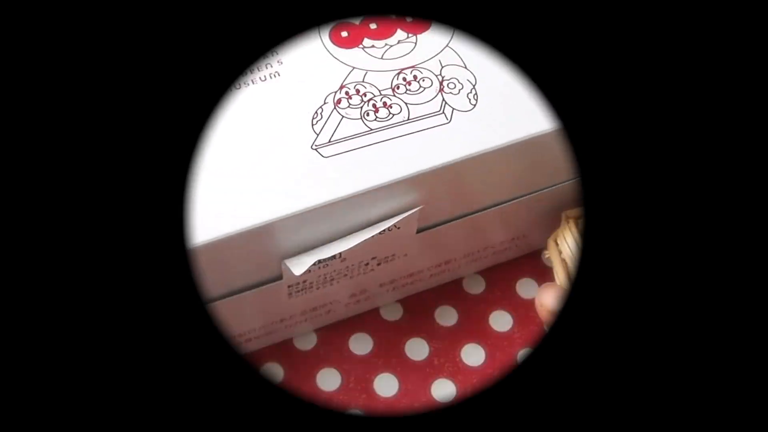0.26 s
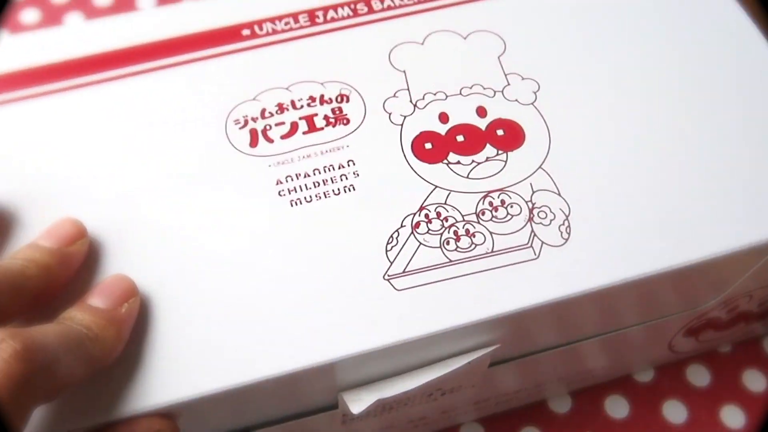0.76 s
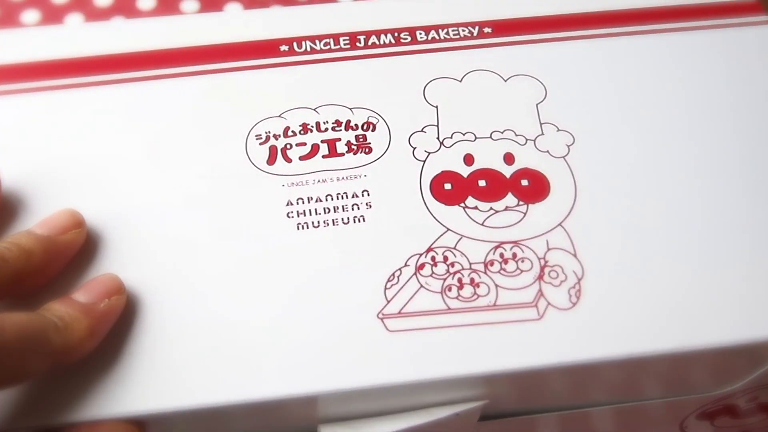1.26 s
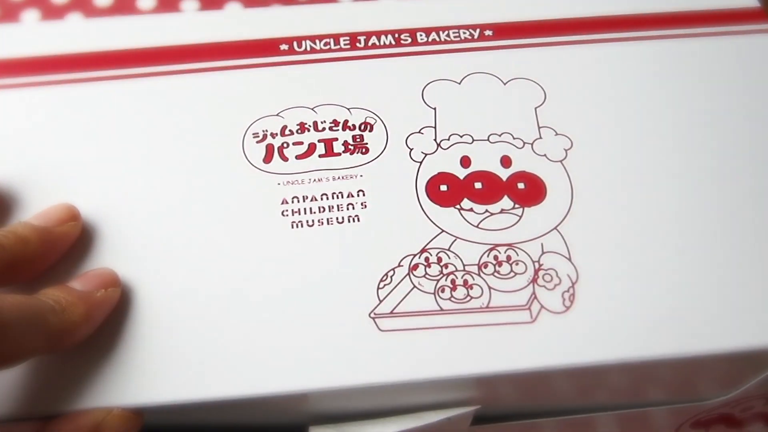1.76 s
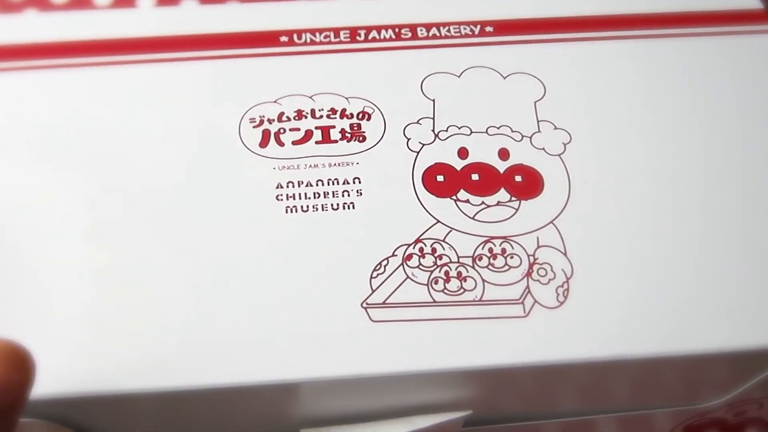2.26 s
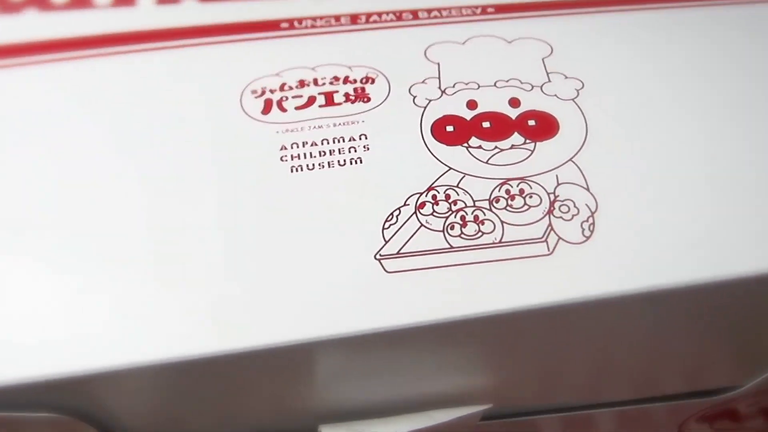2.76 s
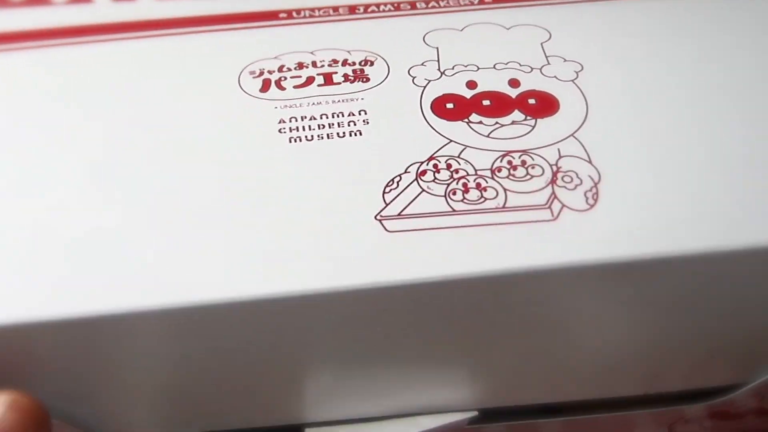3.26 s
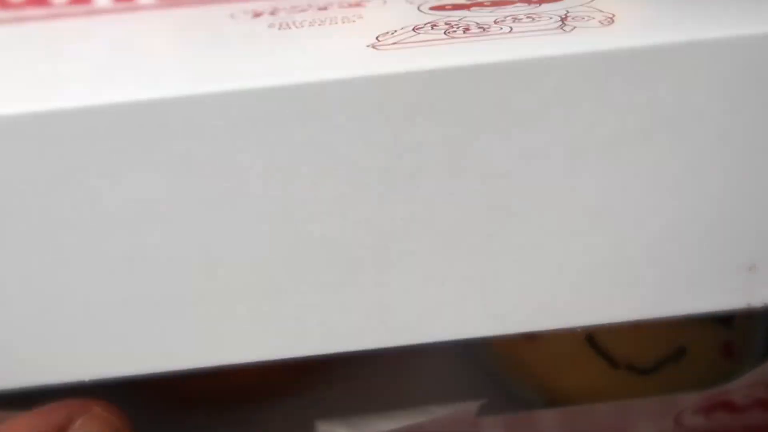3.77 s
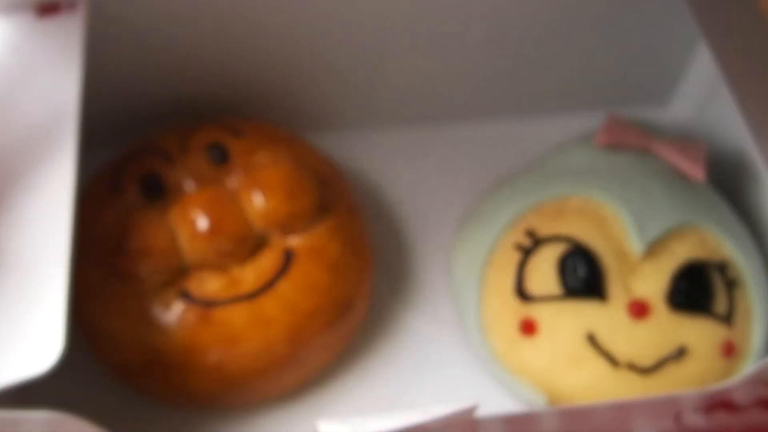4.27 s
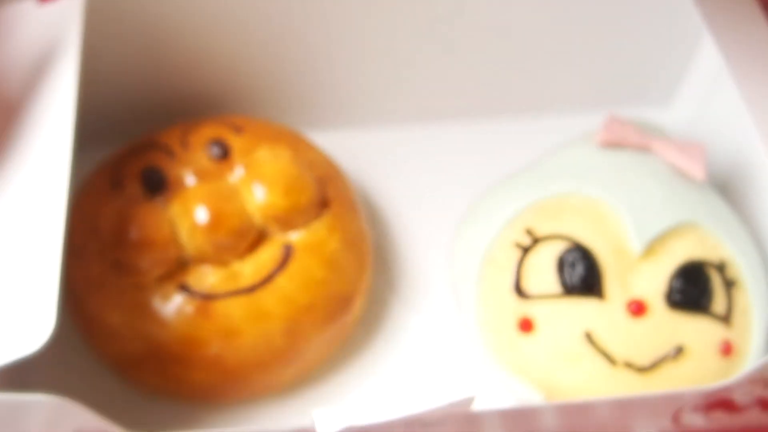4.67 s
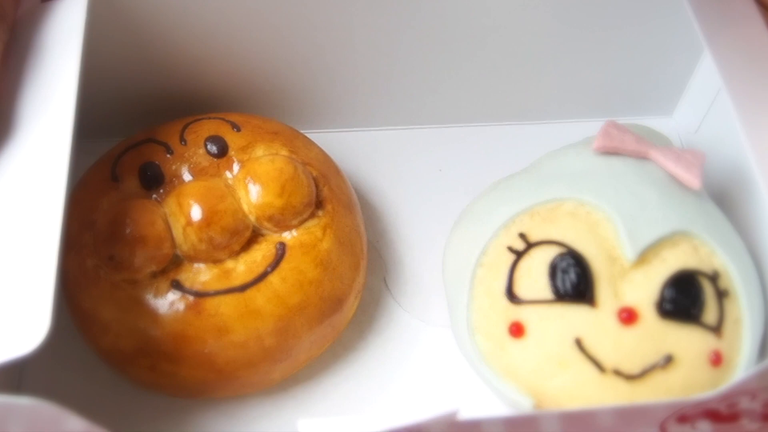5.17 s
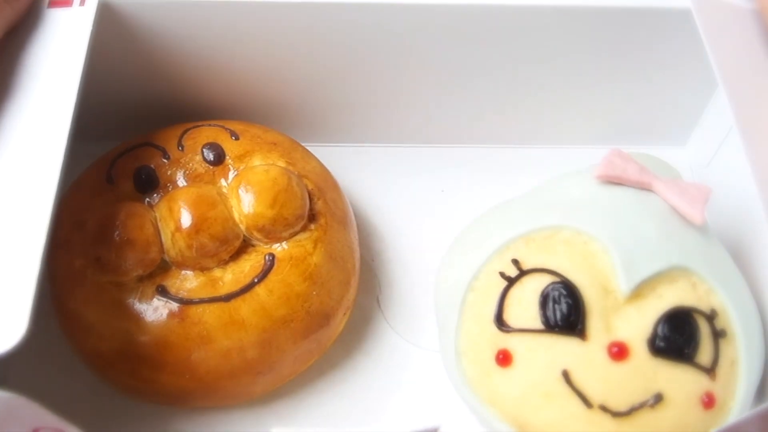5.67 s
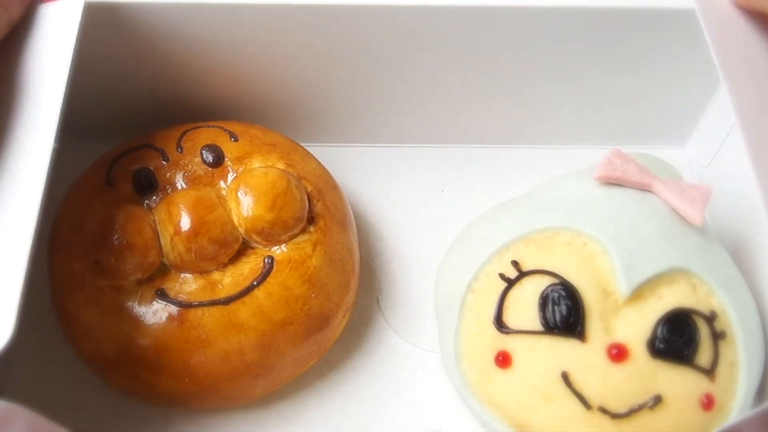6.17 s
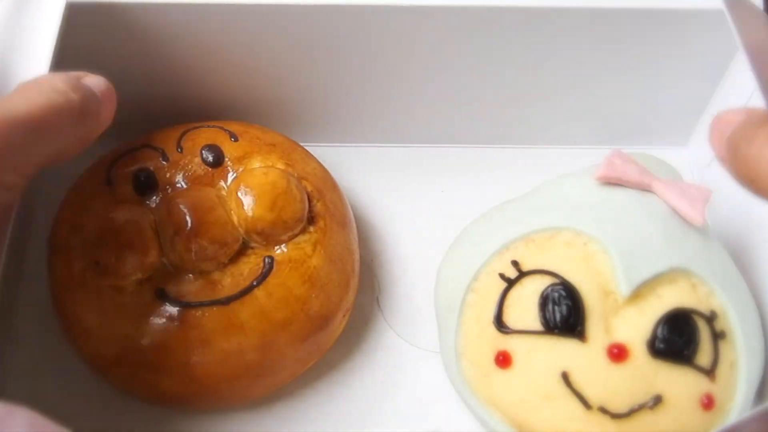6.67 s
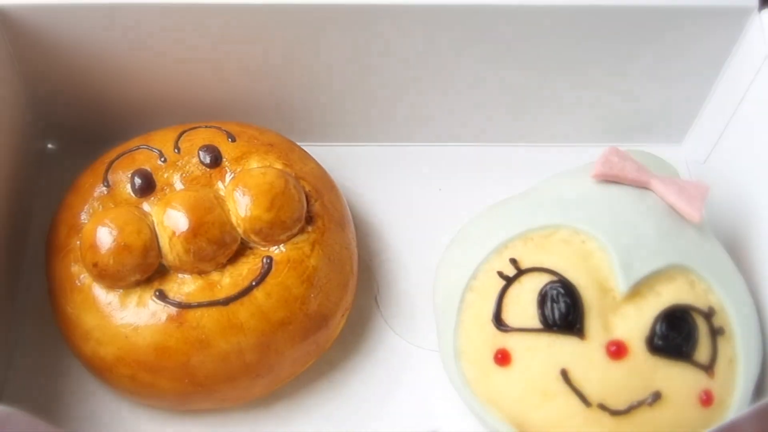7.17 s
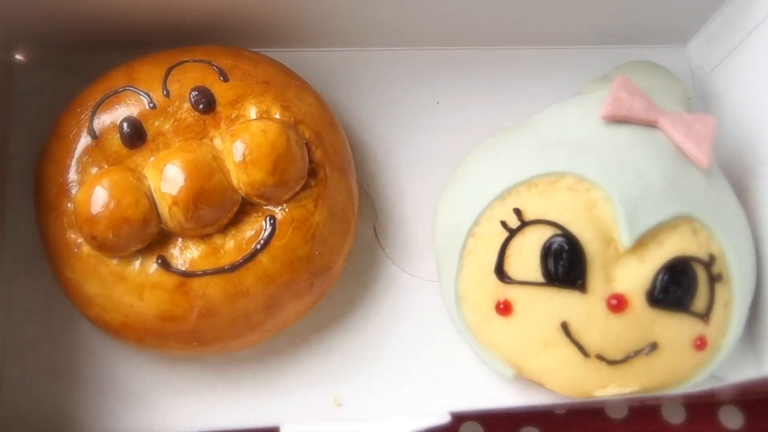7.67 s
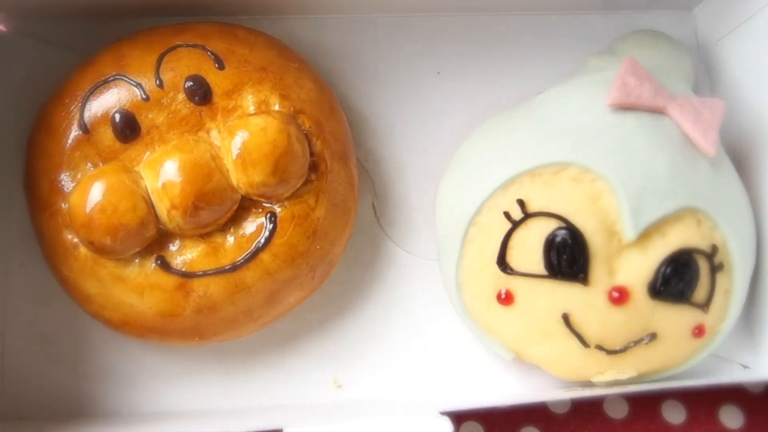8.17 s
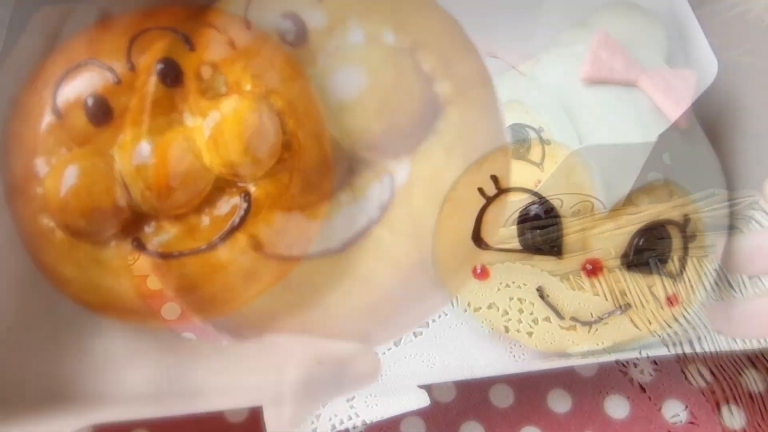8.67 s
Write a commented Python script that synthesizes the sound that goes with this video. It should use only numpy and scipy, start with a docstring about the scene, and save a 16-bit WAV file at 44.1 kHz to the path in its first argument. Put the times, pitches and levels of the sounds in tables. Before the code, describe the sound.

A cardboard box is handled close to the microphone, with light rubbing, clicks and short rasping scrapes as the flap is worked loose. A sharp snap frees the lid, which then bumps down open with hollow knocks and a scrape. Afterwards fingers shift the box gently, making small ticks and a few brief rings of its wall. The small room adds a soft hiss and a faint hum.

```python
"""A hollow paperboard box is opened on a cloth-covered table in a small, quiet room.
Fingers rub the card by stick-slip friction, the tuck flap scrapes and snaps out of its slot, and the
lid swings back and thumps down, exciting the damped modes of the panels and the enclosed air.
Then the box is nudged about, with light ticks and a few brief rings of a single wall.
The room adds a short reverberation, a steady hiss and a faint hum."""
import sys
import numpy as np
from scipy import signal
from scipy.fft import rfft, irfft, next_fast_len
from scipy.io import wavfile
from scipy.ndimage import uniform_filter1d, map_coordinates

SR = 44100
rng = np.random.default_rng(int(sys.argv[2]) if len(sys.argv) > 2 else 0)


def generate_wav(sig):
    """Save sig (samples, or channels by samples) to the path in sys.argv[1] as 16-bit PCM at SR."""
    pcm = np.round(np.clip(np.atleast_2d(sig).T, -1, 1) * 32767).astype(np.int16)
    wavfile.write(sys.argv[1], SR, pcm)


N = 393813
TOP_HZ = 16100  # upper band limit

# Spectra of hissing fibres, a clapping panel and a cracking crease.
# Each row: frequency in Hz, relative spectral density in dB.
HISS_SPECTRUM = [(600, -13), (1400, -7), (2300, -8), (3100, -3.5), (5300, -8.5), (8200, -9.5), (10800, -23),
                 (14000, -19), (16000, -31)]
CLAP_SPECTRUM = [(150, -15), (450, 6.5), (900, 11), (1500, 4), (3000, -0.5), (4500, -18.5), (9000, -26)]
CRACK_SPECTRUM = [(1200, -39), (3000, 11), (4800, 10.5), (8000, 7), (11000, -3.5), (16000, -41)]


def amp(db):
    """Amplitude ratio of a level in decibels."""
    return 10 ** (np.asarray(db) / 20)


def unit(x):
    """Normalisation to rms 1."""
    return x / np.sqrt(np.mean(x ** 2) + 1e-20)


def along(points, hz):
    """Interpolation of (Hz, value) points on a logarithmic frequency axis."""
    knots_hz, values = np.transpose(points)
    return np.interp(np.log(hz + 1), np.log(knots_hz + 1), values)


def wobble(rate):
    """Smooth random modulation: a spline through rate knots a second."""
    knots = rng.standard_normal(int(N * rate / SR) + 4)
    return map_coordinates(knots, [np.arange(N) * rate / SR])


def filtered(x, response):
    """Linear filtering: the spectrum of x times a frequency response."""
    n = x.shape[-1]
    padded = next_fast_len(n + SR // 10)
    return irfft(rfft(x, padded) * response(np.fft.rfftfreq(padded, 1 / SR)), padded)[..., :n]


def stereo(pair, spectrum):
    """Partial coherence: two independent signals become a coloured stereo pair, alike in the bass."""
    # Each row: frequency in Hz, correlation of left and right.
    coherence = [(300, 0.985), (1100, 0.83), (2200, 0.56), (12000, 0.15)]

    def mid_side_gains(hz):
        angle = np.arccos(np.clip(along(coherence, hz), -1, 1)) / 2
        return amp(along(spectrum, hz)) * [np.cos(angle), np.sin(angle)]

    mid, side = filtered(pair, mid_side_gains)
    return unit(np.array([mid + side, mid - side]))


def noise(spectrum, size):
    """Gaussian stereo noise shaped to a spectrum, at rms 1."""
    return stereo(rng.standard_normal((2, size)), spectrum)


def add(track, start_s, sound):
    """Superposition of a sound on a track."""
    part = track[:, max(round(start_s * SR), 0):][:, :sound.shape[-1]]
    part += sound[..., :part.shape[-1]]


def gate(start_s, length_s, attack_s=0.007, release_s=0.016):
    """An envelope that rises, holds and decays exponentially."""
    t = np.maximum(np.arange(N) / SR - start_s, 0)
    return (1 - np.exp(-t / attack_s)) * np.exp(-np.clip((t - length_s) / release_s, 0, 20))


def friction(spectrum, slips_per_s, spread_db, smooth, patchy_db):
    """Stick-slip friction: fibres let go in tiny impulses; resonances shift as the contact travels."""
    slips = (rng.random(N) < slips_per_s / SR) * amp(spread_db * np.minimum(rng.exponential(size=N), 2))
    impulses = unit(slips * np.sign(rng.standard_normal((2, N))))
    rush = impulses + smooth * rng.standard_normal((2, N))
    spectra = signal.stft(rush, nperseg=256)[2]
    patches = uniform_filter1d(rng.standard_normal(spectra.shape[1:]), size=2, axis=0)  # over frequency
    patches = unit(uniform_filter1d(patches, size=24, axis=1))  # over time
    uneven = signal.istft(spectra * amp(patchy_db * patches), nperseg=256)[1][:, :N]
    return stereo(uneven, spectrum)


def rubbing_gains():
    """Incoherent sources add in power: grip and slides set the gains of drumming, rasp and hiss."""
    # The holding hand creeps over the card. Each row: time in seconds, body and treble drive in dB.
    creep = [(0.0, -42.5, -56), (0.15, -52.5, -55), (0.37, -46, -50.5), (0.6, -46.5, -51),
             (1.37, -48.5, -56.5), (1.84, -39.5, -54), (2.29, -50.5, -55.5), (2.51, -43, -52),
             (3.43, -39, -51), (3.78, -50, -57), (4.6, -47, -53), (5.05, -55, -54.5), (5.25, -41, -56.5),
             (5.62, -47, -55), (6.22, -49.5, -53.5), (7.46, -54.5, -55.5), (8.93, -52.5, -58.5)]
    # A finger or flap slides. Each row: start and length in seconds, rasp in dB,
    # drumming and hiss in dB relative to the rasp.
    slides = [(0.563, 0.23, -63.5, 12.5, 16.5), (1.849, 0.19, -44, -2, -0.5), (2.242, 0.12, -44.5, -2, -2),
              (2.382, 0.073, -32.5, -12.5, -12.5), (3.451, 0.18, -41, -7, -3),
              (4.565, 0.19, -58, 9.5, 12.5), (5.175, 0.272, -38.5, -7.5, -20),
              (5.562, 0.057, -46.5, -30, 4), (6.543, 0.35, -52.5, -27, 2.5), (7.229, 0.29, -60, -21, 13),
              (7.864, 0.09, -53.5, -5, 5), (8.266, 0.28, -66.5, -16, 11)]
    stick_db = -54  # a lighter grip sticks and falls silent
    shares = amp([[-5.5], [-5], [5.5]])  # drumming, rasp, hiss
    times, *levels = np.transpose(creep)
    body, treble = [amp(np.interp(np.arange(N) / SR, times, db)) for db in levels]
    grip = np.array([body, body, treble])
    slipping = grip ** 2 / (grip ** 2 + amp(stick_db) ** 2)
    power = (shares * grip) ** 2 * slipping
    for start, length, db, drum_db, hiss_db in slides:
        power += (amp([[db + drum_db], [db], [db + hiss_db]]) * gate(start, length)) ** 2
    return np.sqrt(power)


def rubbing():
    """Friction under uneven hand pressure drums the panels, rasps in the cavity and hisses."""
    drum_gain, rasp_gain, hiss_gain = rubbing_gains()
    # Spectra of the panels and the cavity. Each row: frequency in Hz, relative density in dB.
    drum_spectrum = [(40, -63), (120, -4.5), (220, -6.5), (310, 0.5), (450, 3.5), (620, -6.5), (1300, -62)]
    rasp_spectrum = [(300, -65), (600, 2), (780, 1.5), (870, 7.5), (1030, 5), (1300, -8.5), (2900, -15),
                     (4500, -29), (9000, -61)]
    pressure = amp(1.6 * wobble(40))
    drum = drum_gain * friction(drum_spectrum, slips_per_s=110, spread_db=4.5, smooth=0.5, patchy_db=2)
    rasp = rasp_gain * friction(rasp_spectrum, slips_per_s=400, spread_db=4.5, smooth=0.8, patchy_db=3.2)
    hiss = hiss_gain * friction(HISS_SPECTRUM, slips_per_s=700, spread_db=4.5, smooth=1.1, patchy_db=2.4)
    return pressure * (drum + rasp + hiss) + crinkles(hiss_gain)


def crinkles(hiss_gain, buckles_per_s=24):
    """Rubbed card buckles as a Poisson process, the louder the more it hisses."""
    pops = (rng.random(N) < buckles_per_s / SR) * amp(12 + 2.5 * rng.standard_normal(N))
    return filtered(hiss_gain * pops, lambda hz: amp(along(CRACK_SPECTRUM, hz)))


def reverberation(x):
    """Wall reflections form a diffuse tail that decays exponentially in each band."""
    # Each row: frequency in Hz, reverberation time (t60) in seconds.
    decay_times = [(150, 0.13), (2000, 0.19), (12000, 0.13)]
    hz, t, spectra = signal.stft(noise([(300, -4), (10000, -7)], SR // 2), SR, nperseg=256)
    decay = amp(-60 * t / along(decay_times, hz)[:, None])
    tail = signal.istft(spectra * decay, SR, nperseg=256)[1]
    tail = np.pad(tail / np.linalg.norm(tail[0]), ((0, 0), (SR // 200, 0)))  # 5 ms delay
    return signal.fftconvolve(x, tail, axes=1)[:, :N]


def room_tone():
    """The noise floor: steady hiss and a faint hum that wavers in phase and swells twice."""
    # The hiss. Each row: frequency in Hz, relative density in dB.
    floor_spectrum = [(20, -2), (100, 1.5), (300, 1.5), (440, -3.5), (950, -3.5), (1600, -12),
                      (3200, -13.5), (8500, -21.5), (11000, -26.5)]
    # The hum. Each row: frequency in Hz, level during a swell in dB.
    hum_tones = [(285, -64.5), (435, -63)]
    # Each row: start and length of a swell in seconds.
    hum_swells = [(7.9, .39), (8.57, .36)]
    t = np.arange(N) / SR
    hum = sum(amp(db) * unit(np.sin(2 * np.pi * hz * t + 0.6 * wobble(8))) for hz, db in hum_tones)
    swell = np.maximum(amp(-8), sum(gate(start, length) for start, length in hum_swells))
    return swell * hum + amp(-57.5) * noise(floor_spectrum, N)


def box_ring(t, low_hz, high_hz, scatter_db, detune):
    """Damped free vibration: a soft contact leaves the high modes still, a light one the low modes."""
    # Air and panel modes. Each row: frequency in Hz, relative level in dB, t60 in seconds.
    box_modes = [(115, -13, 0.22), (166, -4, 0.16), (240, -2, 0.07), (306, 2, 0.085), (385, 0, 0.06),
                 (440, 1, 0.07), (583, 0, 0.1), (760, -1, 0.11), (905, 7, 0.075), (1040, 1, 0.06),
                 (1362, -4, 0.07), (2050, -1, 0.04), (2920, -3, 0.04), (3550, -2, 0.02), (4540, -2, 0.022)]
    hz, db, t60 = np.transpose(box_modes)[:, :, None]
    excitation = 1 / np.sqrt(1 + (hz / high_hz) ** 6 + (low_hz / hz) ** 6)
    strength = amp(db + scatter_db * rng.standard_normal(hz.shape)) * excitation
    held_hz = hz * (1 + detune * rng.standard_normal(hz.shape))  # the grip retunes the panels
    modes = strength * amp(-60 * t / t60) * np.sin(2 * np.pi * held_hz * t)
    return modes.sum(0) / np.linalg.norm(strength)


def snaps():
    """Snap-through buckling: a crease gives way with a crack, a panel's clap and a knock of the box."""
    # Each row: start in seconds, base level in dB, relative strength of the crack in dB.
    creases = [(0.337,-30.5,-30), (0.581,-22,-17), (1.021,-25,-21), (1.123,-30.5,-17), (1.365,-32,-11),
               (1.438,-25,-19.5), (1.524,-15,-18.5), (1.655,-14.5,-24), (1.759,-25,-22), (1.773,-16,-19.5),
               (1.864,-9,-12), (2.113,-25.5,-22), (2.782,-20.5,-20.5), (2.894,-27,-12.5), (2.972,-25,-22),
               (2.999,-13.5,-14.5), (3.174,-17.5,-9), (3.324,-26,-20), (3.456,-26.5,-36), (3.520,-3,-19),
               (3.555,-10.5,-20), (3.784,-34.5,-17.5), (3.996,-18.5,-19.5), (4.123,-36.5,-10.5),
               (4.583,-23.5,-16), (5.148,-7,-22), (5.322,-19,-14.5), (5.378,-20,-31), (5.41,-18.5,-23),
               (5.963,-21,-14), (6.561,-29,-18), (6.938,-25.5,-15.5), (7.047,-29.5,-15.5),
               (7.183,-24.5,-17.5), (7.321,-28.5,-23), (7.891,-33.5,-23)]
    out, t = np.zeros((2, N)), np.arange(SR // 5) / SR
    rise = 1 - np.exp(-t / 0.0007)
    for start, db, crack_db in creases:
        tilt_db_per_octave = 0.5 * (crack_db + 10)  # a small stiff edge cracks brighter
        colour = [(hz, level + tilt_db_per_octave * np.log2(hz / SR)) for hz, level in CRACK_SPECTRUM]
        crack_t60 = 0.026 * amp(0.12 * db)  # light snaps are over sooner
        crack = amp(crack_db + 11.5 - 60 * t / crack_t60) * noise(colour, len(t))
        panel = amp(-8.5) * box_ring(t, low_hz=850, high_hz=4500, scatter_db=1.5, detune=0.012)
        slap = amp(-3.5 - 60 * t / 0.05) * noise(CLAP_SPECTRUM, len(t))
        clap = amp(-9.5 - 0.23 * max(crack_db, -18)) * (slap + panel)
        # The knock grows more slowly than the clap, and a stiff edge hardly knocks the box.
        knock_db = -27 + 0.7 * db - 0.51 * crack_db
        knock = amp(knock_db) * box_ring(t, low_hz=340, high_hz=960, scatter_db=2, detune=0.044)
        add(out, start, rise * (amp(db) * (crack + clap) + knock))
    return out


def ticks(fizz_db=-11, fizz_t60=0.014):
    """Impulse excitation: a nail or cut edge clicks and fizzes on the card, too light to move the box."""
    # Each row: start in seconds, peak level in dB, high-pass corner in Hz.
    flicks = [(0.401,-19,4150), (1.051,-19,6560), (5.566,-33,1200), (7.011,-23.5,1500), (7.583,-29.5,1500),
              (7.891,-20,5000), (7.971,-28.5,1500), (8.08,-31.5,1200), (8.665,-25,990), (8.748,-28,1000)]
    out, t = np.zeros((2, N)), np.arange(SR // 20) / SR
    for start, db, low_hz in flicks:
        fizz = amp(fizz_db - 60 * t / fizz_t60) * noise(HISS_SPECTRUM, len(t))
        click = band_limit((t == 0) + fizz, low_hz)
        add(out, start, amp(db) * click / np.abs(click).max())
    return out


def band_limit(x, low_hz):
    """A second-order high-pass filter with a sharp cut at TOP_HZ."""
    return filtered(x, lambda hz: (1j * hz / (low_hz + 1j * hz)) ** 2 * (hz < TOP_HZ))


def resonate(x, f0, q):
    """Forced response of a resonator at f0 Hz with quality factor q, at rms 1."""
    return unit(filtered(x, lambda hz: hz * f0 / (hz * f0 + 1j * q * (hz ** 2 - f0 ** 2))))


def scrapes():
    """Forced vibration: card drags over card in dense slips, so the panel rings and the edge rasps."""
    # Each row: start and length in seconds, level in dB, relative hiss in dB,
    # resonances of the panel and of the edge in Hz.
    drags = [(1.781, 0.04, -18.5, 0, 1020, 5340), (1.817, 0.047, -23, -5.5, 642, 4600),
             (1.860, 0.013, -15, 0.5, 906, 8100), (2.431, 0.053, -31.5, -6.5, 497, 3270),
             (2.483, 0.032, -31.5, -0.5, 940, 3100), (2.487, 0.12, -32.5, -5.5, 933, 2830),
             (2.636, 0.065, -35.5, -8.5, 957, 2920), (2.716, 0.028, -31, -4.5, 1020, 2940),
             (2.984, 0.034, -27, -7.5, 980, 4520), (3.094, 0.084, -31.5, -0.5, 1090, 2680),
             (3.164, 0.048, -37.5, 7, 890, 5770), (5.027, 0.074, -39.5, 0, 2060, 4970),
             (5.16, 0.11, -35, -33, 890, 1700), (5.268, 0.17, -36.5, 0.5, 950, 4100),
             (6.817, 0.058, -45, -10, 1760, 3300)]
    out, t = np.zeros((2, N)), np.arange(SR // 4) / SR
    body = friction(CLAP_SPECTRUM, slips_per_s=900, spread_db=2, smooth=0.8, patchy_db=2)
    edge = friction(HISS_SPECTRUM, slips_per_s=2500, spread_db=2, smooth=0.8, patchy_db=2)
    chatter = unit(amp(1.8 * wobble(400)))  # the edge sticks and slips
    for start, length, db, hiss_db, panel_hz, edge_hz in drags:
        span = slice(round(start * SR), round(start * SR) + len(t))
        ring = resonate(body[:, span], panel_hz, q=11)
        rasp = unit(edge[:, span] + amp(-1) * resonate(edge[:, span], edge_hz, q=6))
        hardness = amp(hiss_db) / (amp(hiss_db) + 1)  # a hard edge rasps, a soft fingertip rings
        contact = (1 - hardness) * ring + hardness * body[:, span] + amp(hiss_db) * rasp
        stroke = (1 - np.exp(-(4 * t / length) ** 2)) * np.exp(-(t / length) ** 4)
        add(out, start, amp(db) * stroke * chatter[span] * contact)
    return out


def thumps():
    """A cushioned impact excites the box's low modes while its loose panels shudder briefly."""
    # Lid and box bump down. Each row: start in seconds, level in dB, edges of the excited band in Hz.
    bumps = [(1.866, -5.5, 340, 580), (3.525, -14.5, 110, 900), (3.556, -26, 100, 250),
             (5.018, -6, 160, 474), (5.147, -0.5, 125, 1030), (5.244, -9, 121, 427),
             (5.964, -25.5, 110, 500), (7.182, -23.5, 230, 297), (7.32, -24.5, 170, 346)]
    out, t = np.zeros((2, N)), np.arange(SR // 3) / SR
    rise = 1 - np.exp(-t / 0.002)
    for start, db, low_hz, high_hz in bumps:
        boom = box_ring(t, low_hz, high_hz, scatter_db=1, detune=0.006)
        band = [(low_hz / 2, -24), (low_hz, 0), (high_hz, 0), (2 * high_hz, -22), (SR / 2, -100)]
        shudder = amp(2 - 60 * t / 0.032) * noise(band, len(t))
        add(out, start, amp(db) * rise * (boom + shudder) / 2)
    return out


def plucks():
    """A fingertip slips off a wall, leaving one damped mode, lower each time as the grip loosens."""
    # Each row: start in seconds, level in dB, pitch in Hz, t60 in seconds.
    releases = [(5.963, -22, 950, .04), (5.998, -25.5, 930, 0.028), (6.178, -30.5, 885, 0.11),
                (6.283, -26.5, 860, 0.068)]
    out, t = np.zeros((2, N)), np.arange(SR // 5) / SR
    for start, db, hz, t60 in releases:
        rise = 1 - np.exp(-t / (0.037 * t60))
        add(out, start, rise * amp(db - 60 * t / t60) * np.sin(2 * np.pi * hz * t))
    return out


def scene():
    """Superposition of the box's direct sound, its reverberation and the noise floor."""
    box = rubbing() + scrapes() + snaps() + ticks() + plucks() + thumps()
    return box + amp(-11.5) * reverberation(box) + room_tone()


def record(dry):
    """The sound fades in; a small microphone rounds peaks by soft saturation and limits the band."""
    fade_s, ceiling = 0.2, 0.7
    fade = np.clip(np.arange(N) / SR / fade_s, 0, 1) ** 1.2
    rounded = dry / (1 + (dry / ceiling) ** 4) ** 0.25
    return band_limit(rounded * fade, low_hz=72)


dry = scene()
out = record(dry)
generate_wav(out)
```